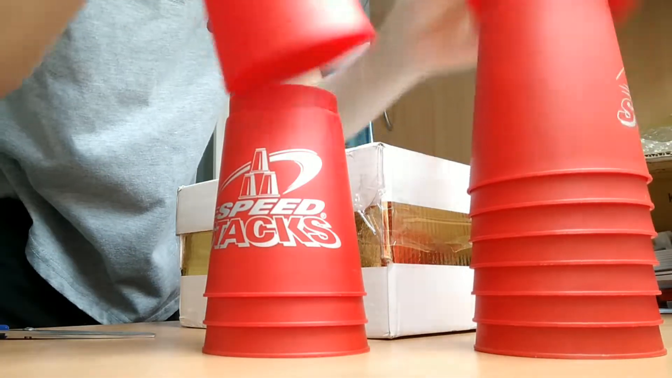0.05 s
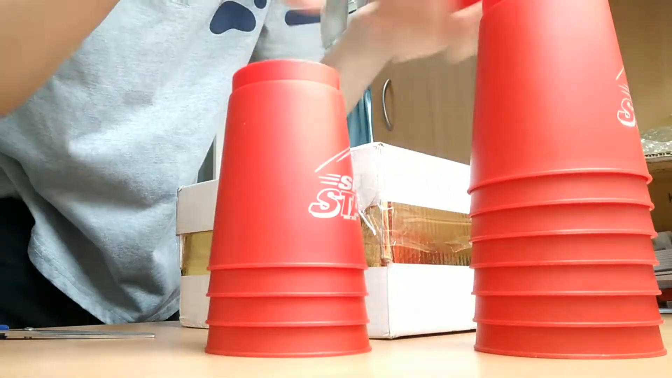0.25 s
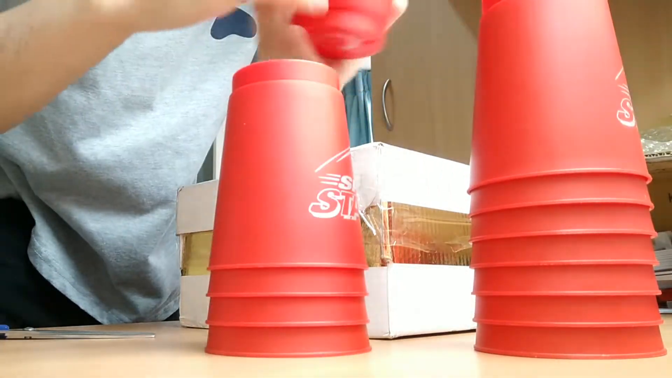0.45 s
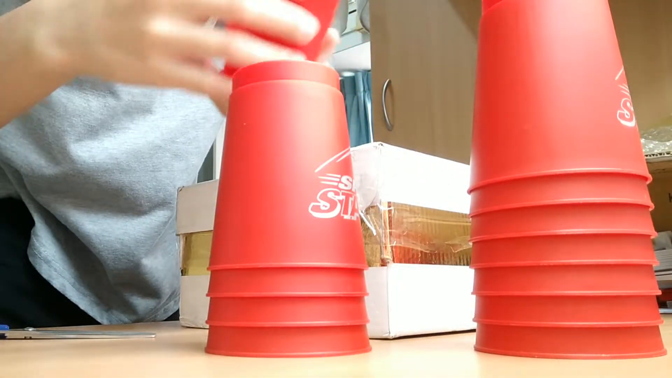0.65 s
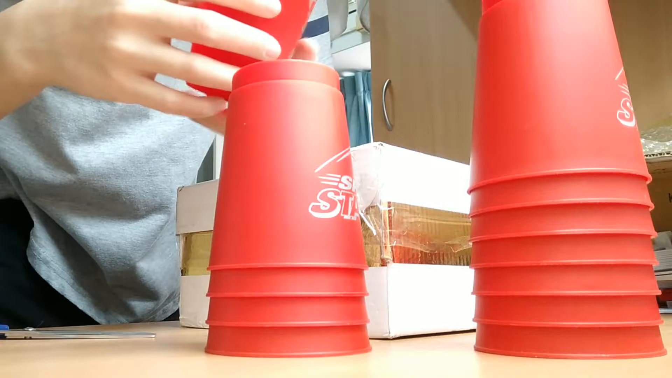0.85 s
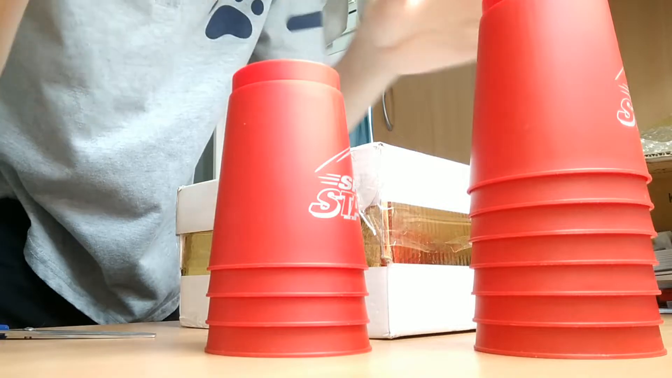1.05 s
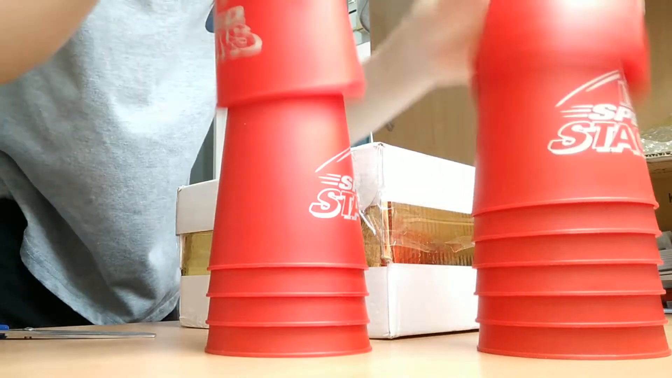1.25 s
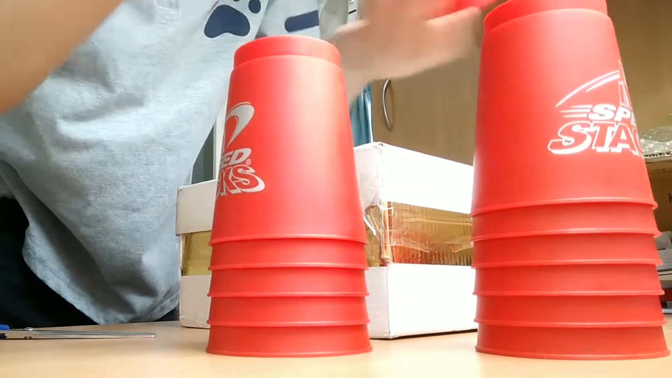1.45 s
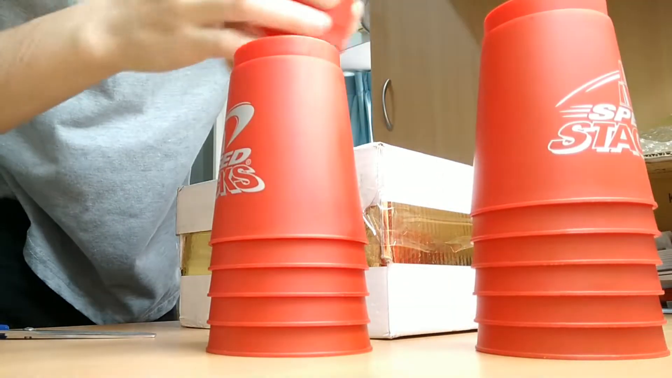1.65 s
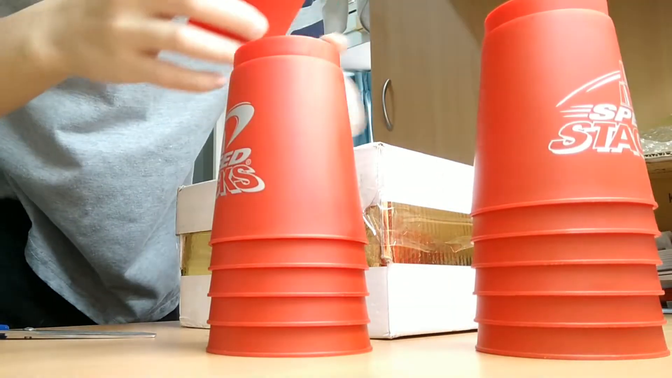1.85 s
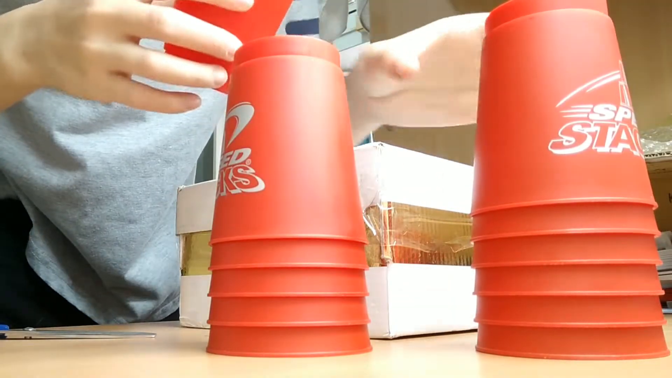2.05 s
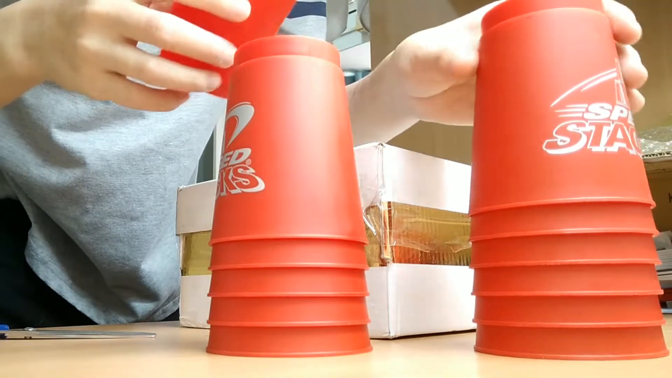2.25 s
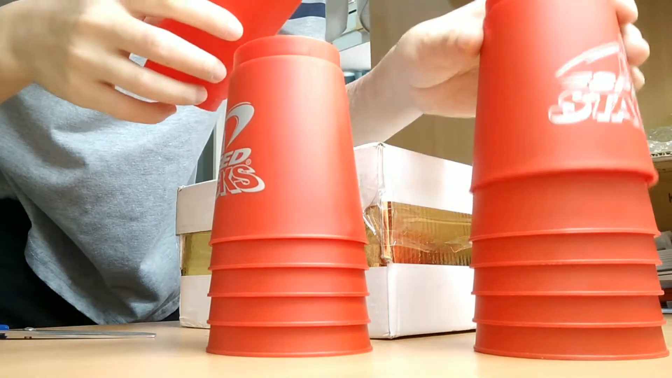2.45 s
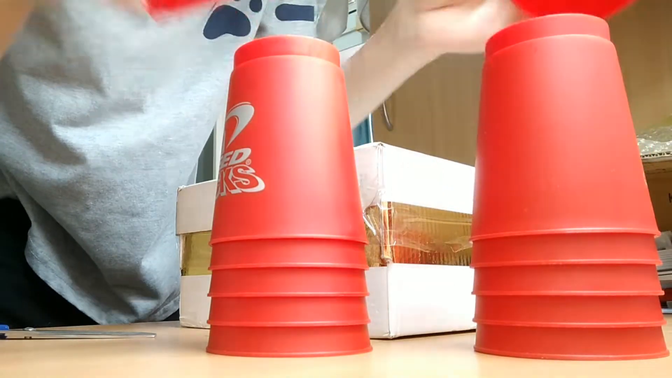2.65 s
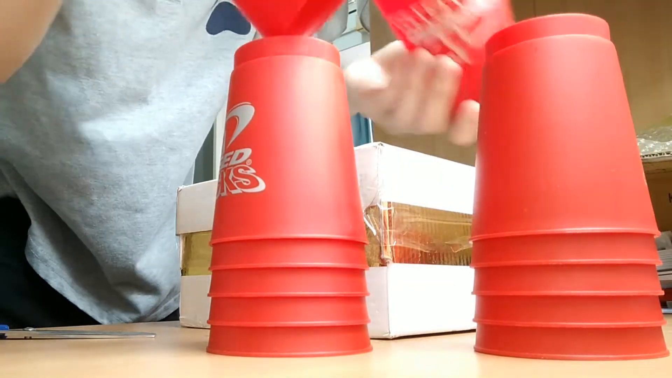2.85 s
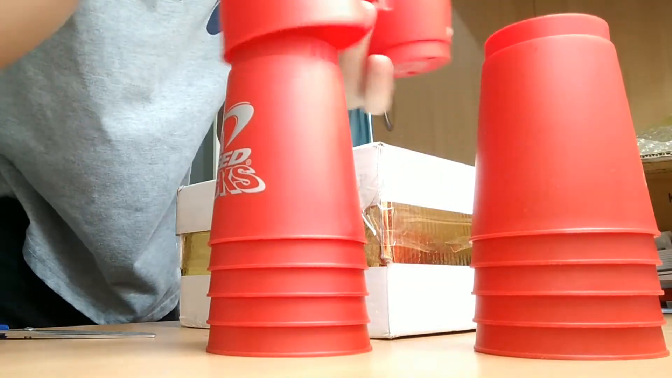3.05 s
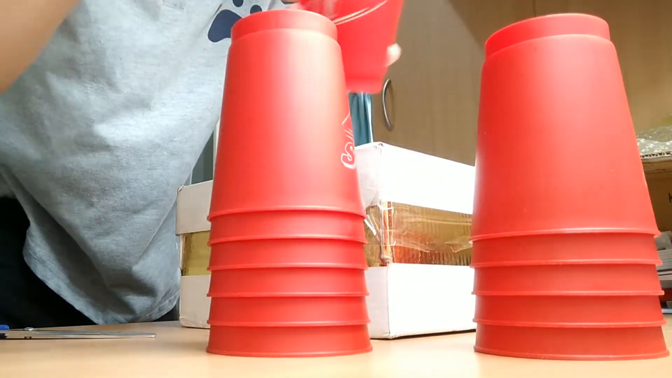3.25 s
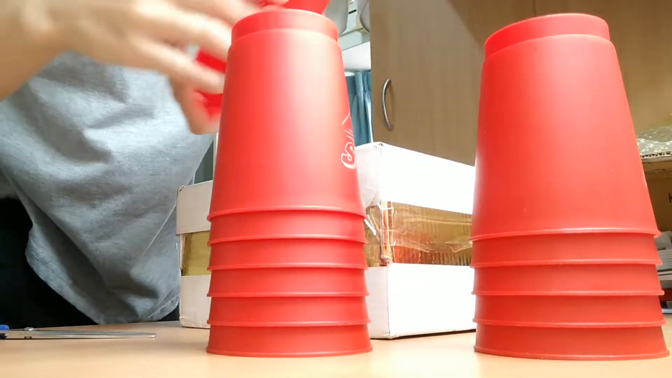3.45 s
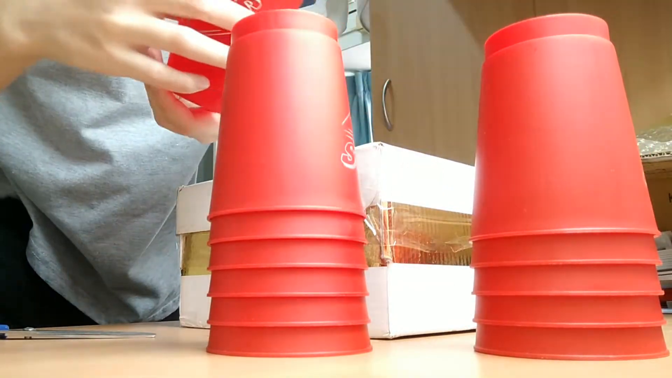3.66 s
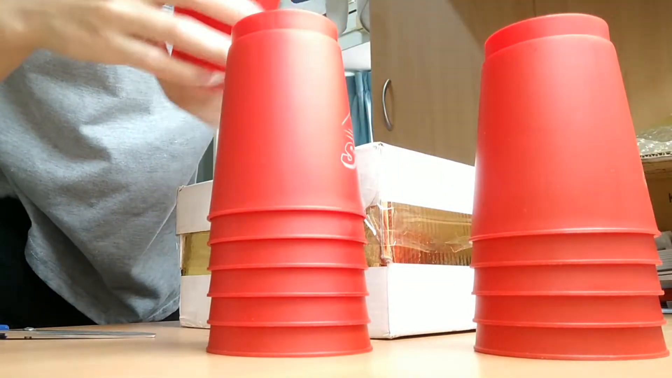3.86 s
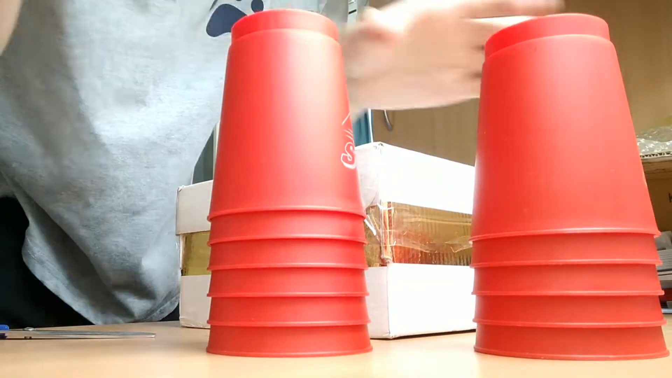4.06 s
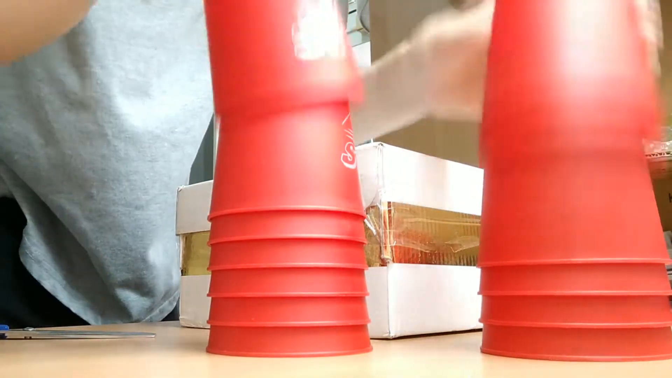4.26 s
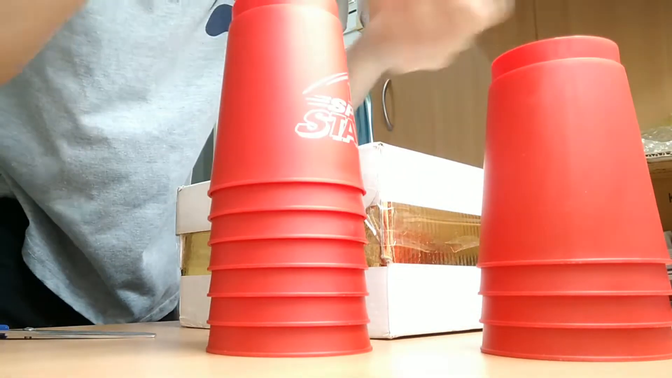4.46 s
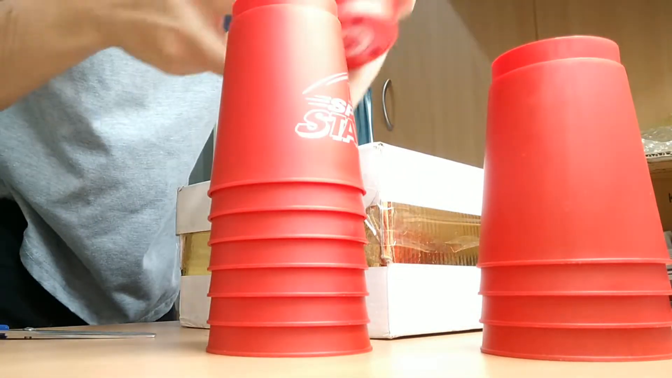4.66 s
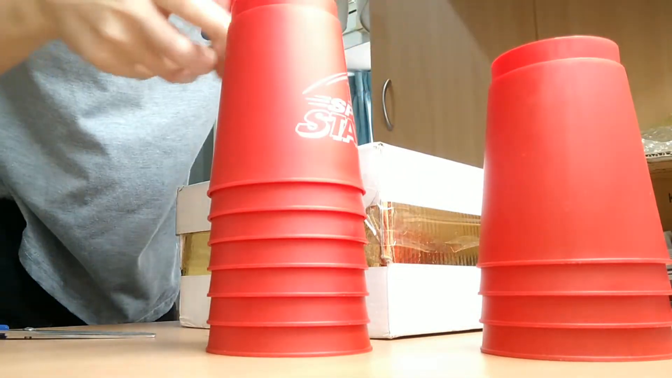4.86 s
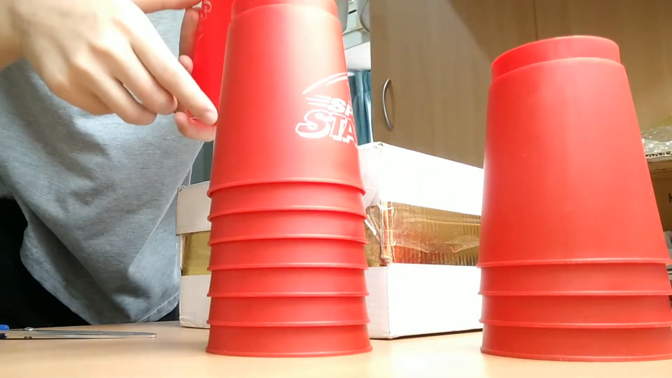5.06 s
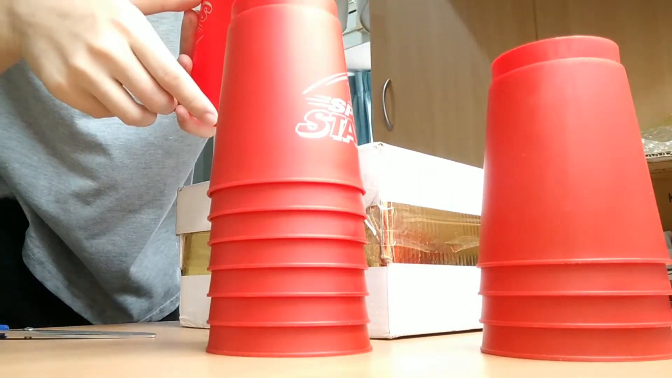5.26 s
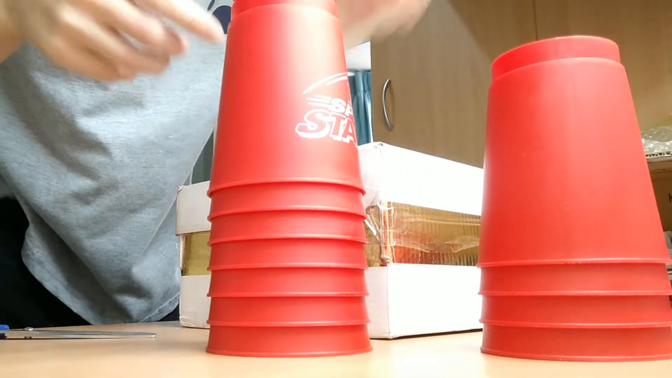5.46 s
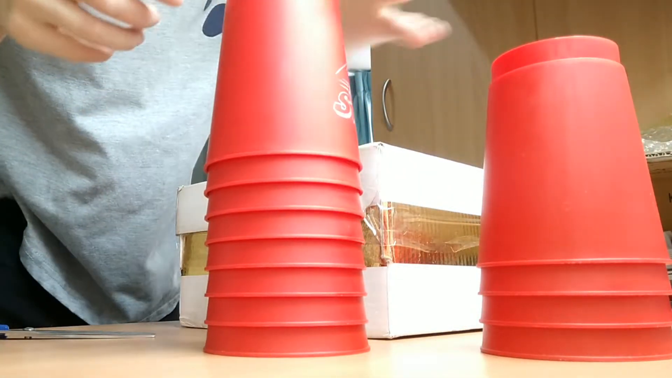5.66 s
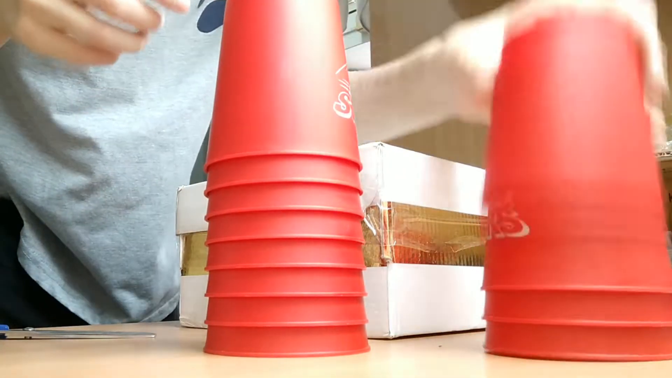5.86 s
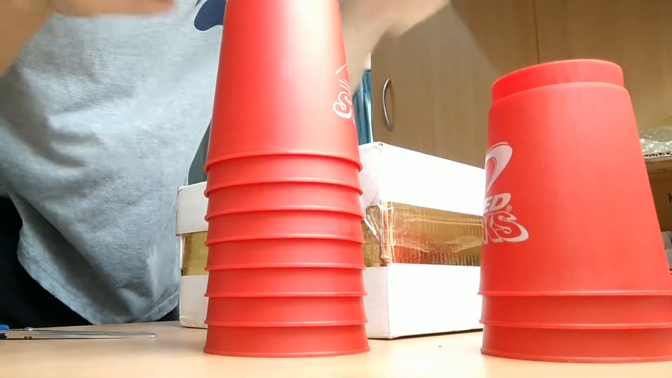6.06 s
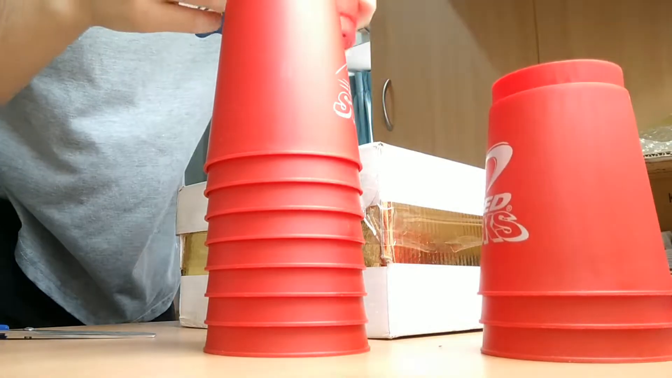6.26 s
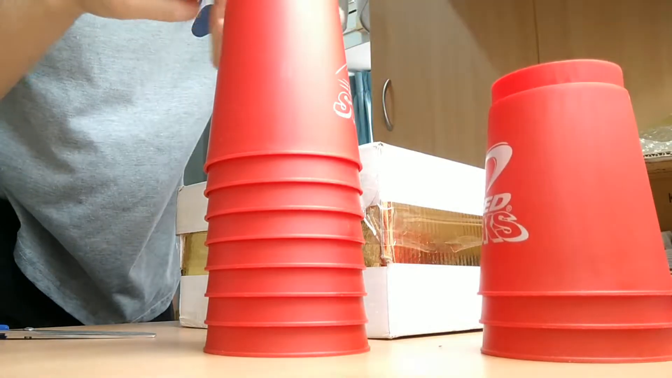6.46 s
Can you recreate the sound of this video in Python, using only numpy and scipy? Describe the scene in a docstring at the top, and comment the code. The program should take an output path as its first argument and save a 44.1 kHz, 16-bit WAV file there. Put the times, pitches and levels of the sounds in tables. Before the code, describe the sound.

Thin plastic cups clack and rattle in loud quick bursts as they are dropped onto nested stacks on a wooden table, with faint finger creaks between.

```python
"""A soft bump and a short hiss come first: a hand draws a thin plastic cup off its nested stack.
Then cups are lifted and dropped on stacks on a wooden table in a small quiet room. Rattling contacts ring
cup walls and rims, pushes boom in the table top, friction noise hisses in the gap between sliding walls,
and fingertip slips creak and rustle. Filtered noise and one sine make the low rumble and hum under all."""
import sys
import numpy as np
from scipy import signal
from scipy.fft import rfft, irfft, next_fast_len
from scipy.io import wavfile
from scipy.ndimage import uniform_filter1d

SR = 44100
rng = np.random.default_rng(int(sys.argv[2]) if len(sys.argv) > 2 else 0)


def waveform_to_disk(signal):
    """Save audio, clipped to [-1, 1], as 16-bit WAV at the path in sys.argv[1]."""
    frames = np.transpose(np.atleast_2d(signal))
    scaled = np.clip(frames, -1, 1) * 32767
    samples = np.round(scaled).astype(np.int16)
    wavfile.write(sys.argv[1], SR, samples)


def how_loud(loudness_db):
    """Turn decibels into a plain amplitude multiplier (0 dB gives 1, 20 dB gives 10)."""
    steps = np.asarray(loudness_db, float) / 20
    return 10 ** steps


N = 287091  # length in samples

# Rim meets rim or wood. Each row: start in seconds, cup level in dB, favoured wall pitch in Hz,
# table level in dB, crack level of the rim in dB. Fixed trims are added to the levels later.
KNOCKS = [(0.193, -9, 1432, -27.5, -19), (0.28, -21.5, 1084, -27.5, -25), (0.303, -9.5, 1530, -28, -24),
          (0.319, -6, 1454, -19, -22.5), (1.315, -32.5, 564, -39, -54), (1.36, -25.5, 589, -25, -30),
          (1.371, -16.5, 1144, -34, -24), (1.423, -24, 1030, -32.5, -27.5),
          (1.44, -4.5, 1190, -22.5, -12.5), (1.46, -6, 580, -15, -18.5), (2.383, -41.5, 530, -35, -62),
          (2.709, -36.5, 1190, -80.5, -37), (2.935, -10.5, 1100, -20, -27), (3.01, -39, 1600, -43.5, -32),
          (3.125, -15, 1520, -30.5, -31.5), (3.168, -23, 1497, -25.5, -40), (3.233, -32.5, 1770, -39, -42),
          (3.242, -27.5, 1100, -48.5, -36.5), (3.3, -13, 1100, -23, -21), (3.327, -3, 1072, -14.5, -18.5),
          (4.349, -18, 1173, -27, -26), (4.366, -17.5, 562, -23.5, -29), (4.38, -10.5, 1050, -24, -20.5),
          (4.388, -11, 1080, -25.5, -20), (4.42, -19, 1070, -22, -24.5), (4.436, -15.5, 568, -33.5, -26.5),
          (4.458, -11.5, 1000, -20, -29), (4.821, -40, 1093, -85.5, -70.5), (5.666, -6.5, 1082, -21.5, -18),
          (5.675, -9.5, 1100, -26, -16.5), (5.686, -8.5, 1090, -27, -14), (5.704, -20.5, 1100, -37.5, -41),
          (5.721, -28.5, 602, -24.5, -39.5), (5.734, -16, 543, -26, -24), (5.754, -11, 1000, -18.5, -21),
          (5.953, -34, 550, -34, -48.5), (5.973, -27, 567, -45, -33.5), (5.999, -14, 1120, -25.5, -32),
          (6.007, -7.5, 1190, -45, -27.5), (6.033, -24, 1465, -24, -30.5)]
# Ways the cup wall rings. Each row: pitch in Hz, relative level in dB, time to fall by 60 dB in seconds.
WALL_MODES = [(547, -2, 0.092), (638, 0.5, 0.037), (796, -2, 0.013), (1000, -6, 0.032), (1100, -2.5, 0.032),
              (1190, 2.5, 0.037), (1510, -2.5, 0.039), (1530, 0, 0.018), (1714, -8, 0.063),
              (2309.6, -4.5, 0.014), (2525, -6.5, 0.0086)]
# Ways the rim rings. Each row: pitch in Hz, relative level in dB, time to fall by 60 dB in seconds.
RIM_MODES = [(2650, -3, 0.034), (2920, 2.5, 0.011), (3260, 4.5, 0.012), (3900, -5, 0.0093), (4375, 0, 0.01),
             (5020, -2.5, 0.011), (6115, -6.5, 0.01), (6800, -8, 0.0072), (7540, -8.5, 0.0051),
             (9950, -12.5, 0.0058)]


def knocks():
    """Each contact is a short rattle that rings the cup wall and rim."""
    rattle_t60, place_s = 0.025, 0.00005  # seconds; place_s: spread of the arrival gap between the ports
    # the more a knock cracks against its ring, the higher the rim modes it favours
    crack_hz, octaves_per_db, sharpest_db = 4600, 0.36, -8
    cups = np.zeros((3, N))  # left, right, and the plainer clack that leaves for the room walls
    chance = rng.standard_normal((len(KNOCKS), 3, 12))
    rattle = rng.standard_normal((len(KNOCKS), 2000))
    wall_hz = np.transpose(WALL_MODES)[0]
    t = np.arange(rattle.shape[1]) / SR
    impulse = signal.unit_impulse(300)
    walls, rims = len(WALL_MODES), len(RIM_MODES)
    for (s, cup_db, ring_hz, _, crack_db), (luck, *ears), noise in zip(KNOCKS, chance, rattle):
        force = noise * (1 - np.exp(-t / 0.001)) * how_loud(-60 * t / rattle_t60)

        # the nearest wall mode takes the favoured pitch, the others are slightly off
        off = abs(wall_hz - ring_hz)
        pull = np.where(off == off.min(), ring_hz / wall_hz, 1 + 0.02 * luck[:walls])
        wall_db = favour(WALL_MODES, ring_hz, depth_db=11, octaves=0.19)
        wall = np.array([ring(WALL_MODES, wall_db + 2.2 * e[1:walls + 1], pull, 0.088) for e in ears])
        wall = struck(band(force, 450, 2400), wall, cup_db + 1.5)

        # the rim beams each mode its own way, so the ports hear different mixtures
        dullness_db = min(crack_db - cup_db - sharpest_db, 0)
        rim_hz = crack_hz * 2 ** (octaves_per_db * dullness_db)
        rim_db = favour(RIM_MODES, rim_hz, depth_db=12.5, octaves=4.1)
        rim = np.array([ring(RIM_MODES, rim_db + 3.8 * e[:rims], 1 + 0.043 * e[-rims:], 0.018) for e in ears])
        rim = struck(band(force, 1800, 9400), rim, crack_db + 6.5)

        add(cups[2], s, struck(force, band(impulse, 450, 1600), cup_db - 1.5))
        add(cups[2], s, struck(force, band(impulse, 1500, 6100), crack_db + 2))
        # each knock comes from its own spot
        for port, gap_s in enumerate((0, place_s * luck[-1])):
            add(cups[port], s + gap_s, wall[port])
            add(cups[port], s + gap_s, rim[port])
    return cups


# A wrist or arm bumps the table. Each row: start in seconds, table level in dB before a fixed trim.
BUMPS = [(0.021, -38), (1.188, -47), (3.509, -39.5), (5.01, -50), (6.428, -47)]
# Ways the table top rings. Each row: pitch in Hz, relative level in dB, time to fall by 60 dB in seconds.
TABLE_MODES = [(87.5, -12, 0.69), (125.4, -6.5, 0.34), (170, -4.5, 0.095), (203.24, 6, 0.18),
               (211, 4.5, 0.12), (260, -7, 0.079), (330.5, -13, 0.12)]


def thuds():
    """Every knock and bump is a soft push that rings the table top."""
    spot_db = 3.5  # how much the modes change with the spot that is pushed
    table = np.zeros(N)
    pushes = [(row[0], row[3]) for row in KNOCKS] + BUMPS
    modes = len(TABLE_MODES)
    for (s, table_db), luck in zip(pushes, rng.standard_normal((len(pushes), 12))):
        body = ring(TABLE_MODES, spot_db * luck[:modes], 1 + 0.015 * luck[-modes:], 0.3)
        add(table, s, struck(signal.windows.hann(130), body, table_db + 4))
    return table


# Wall slides on wall: a cup is drawn off its stack, sinks over a stack, shuffles to rest after a blow,
# or brushes another in the hand. Each row: start in seconds, length in seconds, then the levels of hiss,
# wall and table in dB at full speed (the wall gets a fixed trim).
LIFTS = [(0.035, 0.14, -41.5, -59, -61.5), (2.505, .215, -41.5, -52, -74)]
DROPS = [(1.29, .145, -37, -36, -30.5), (4.31, 0.13, -37, -32.5, -34), (5.712, .04, -40.5, -26.5, -27),
         (5.935, .112, -37.5, -35.5, -34.5)]
SETTLES = [(0.21, 0.12, -48.5, -42, -40), (2.39, 0.041, -68, -44.5, -45), (4.875, 0.059, -64.5, -54, -84),
           (5.695, .02, -32.5, -24, -28.5)]
SCUFFS = [(2.94, 0.03, -41.5, -30, -35.5), (3.0, 0.036, -50, -41.5, -52), (4.822, 0.054, -55, -38, -84)]
# How each kind moves. One row each: speed at the start in dB, rise and fall as shares of the length,
# speed the fall heads for in dB, gap resonance in Hz at the start and at the end.
LIFT_MOTION = (-31, 0.76, 0.15, -12, 3649, 4950)
DROP_MOTION = (-39, 0.68, 0.33, -5.5, 3699.5, 3998.5)
SETTLE_MOTION = (-1.5, 0.4, 1.33, -11.5, 3252, 4001)
SCUFF_MOTION = (-7.5, 0.43, 0.56, -9.5, 2902, 3202.5)
# Resonances of the air gap. Each row: multiple of the main gap pitch, core filter width in Hz,
# relative level in dB.
GAP_MODES = [(1, 420, 1), (1.6, 1100, 0), (2.4, 3500, -2), (.74, 600, -4), (1.3, 1500, -5)]


def slides():
    """Friction grains sing in the air gap between two walls, rising as it opens, and shake wall and table."""
    grit_db = 3.2  # unevenness of the friction
    skirt = 4  # skirt width over core width of a gap resonance
    wall_follows = 0.8  # wall dB per dB of speed
    wobble = 0.035  # the cup rocks, so the gap resonance wanders by this share
    rub_widens = 3.4  # width in Hz times ring time in seconds of a wall mode under rubbing
    hiss, table = np.zeros(N), np.zeros(N)
    wall_modes = [(hz, rub_widens / t60, db) for hz, db, t60 in WALL_MODES]
    kinds = ((LIFTS, LIFT_MOTION), (DROPS, DROP_MOTION), (SETTLES, SETTLE_MOTION), (SCUFFS, SCUFF_MOTION))
    for rows, (*motion, first_hz, last_hz) in kinds:
        for s, length, hiss_db, wall_db, table_db in rows:
            progress, speed_db = swell(length, *motion)
            count = len(progress)
            rocking = uniform_filter1d(uniform_filter1d(rng.standard_normal(count), 500), 500)
            gap_hz = first_hz + (last_hz - first_hz) * progress
            gap_hz = gap_hz * (1 + wobble * evened(rocking))
            grit = evened(uniform_filter1d(rng.standard_normal(count), 70))
            grains = rng.standard_normal(count) * how_loud(grit_db * grit)

            # faster sliding is brighter: extra dB per octave above the main gap pitch
            bright_db = 0.82 * (np.clip(hiss_db + speed_db, -80, -40) + 43)
            gap = np.zeros(count)
            for multiple, width, db in GAP_MODES:
                core = resonate(grains, multiple * gap_hz, width)
                tone = resonate(core, multiple * gap_hz, width * skirt) / np.sqrt(width)
                gap += how_loud(db + bright_db * max(np.log2(multiple), 0)) * tone
            # the gap is too narrow to pass low tones
            gap = band(band(gap, 2600, 11000), 2600, 14000)
            wall = band(band(modes_on(grains, wall_modes), 900, 3500), 800, 4000)
            shake = evened(resonate(resonate(grains, 205, 38), 205, 81))

            edge = signal.windows.tukey(count, 0.12)
            gap = how_loud(hiss_db + speed_db) * evened(gap)
            wall = how_loud(wall_db - 7 + wall_follows * speed_db) * wall
            add(hiss, s, (gap + wall) * edge)
            add(table, s, how_loud(table_db + 0.4 * speed_db) * shake * edge)
    return hiss, table


# Fingers turn a cup. Each row: start in seconds, length in seconds, creak and rustle in dB at full grip.
CREAKS = [(0.573, .05, -92, -83.5), (1.15, .14, -81, -86), (1.601, 0.093, -76.5, -85.5),
          (1.689, 0.062, -87.5, -69.5), (2.86, 0.077, -74, -79), (3.039, 0.053, -57.5, -67),
          (3.447, 0.15, -74, -83.5), (4.08, 0.15, -74, -77), (4.544, 0.0886, -78, -80),
          (4.301, 0.066, -78, -75.5), (4.647, .09, -82, -69), (5.645, 0.015, -61.5, -89.5)]
# Single slips of a fingertip. Each row: start in seconds, creak and rustle in dB at the start.
TICKS = [(0.8596, -72.5, -66), (3.9244, -71.5, -82), (4.704, -70.5, -79), (4.7242, -71, -85),
         (4.7523, -63.5, -81), (4.7872, -85, -78), (5.0403, -72, -78), (5.1108, -68, -79),
         (5.1577, -70.5, -78.5), (5.232, -60, -75.5), (5.3282, -76, -85), (5.4575, -64, -78),
         (6.337, -58.5, -61.5), (6.4741, -63, -81.5)]
# Creaking tones. Each row: pitch in Hz, filter width in Hz, relative level in dB.
CREAK_MODES = [(1530, 160, -2.5), (1580, 90, -6)]
# Rustling bands. Each row: pitch in Hz, filter width in Hz, relative level in dB.
RUSTLE_MODES = [(3353, 550, -0.5), (5200, 820, -5.5), (6340, 890, 2), (8150, 3000, 0)]


def creaks():
    """Skin sticks and slips on the wall in small irregular clicks, and rustles over it."""
    grip_share, release_share, faint_db = 0.25, 0.12, -13.5  # a spell swells from faint, holds, and fades
    slip_s, creak_fall_db, rustle_fall_db = 0.06, -18, -32  # a single slip fades by this much
    creak, rustle = np.zeros(N), np.zeros(N)
    touches = []
    for s, length, creak_db, rustle_db in CREAKS:
        grip_db = swell(length, faint_db, grip_share, release_share, faint_db)[1]
        touches.append((s, creak_db + grip_db, rustle_db + grip_db))
    fade = swell(slip_s, 0, 1, 1, 0)[0]
    for s, creak_db, rustle_db in TICKS:
        touches.append((s, creak_db + creak_fall_db * fade, rustle_db + rustle_fall_db * fade))
    for s, creak_db, rustle_db in touches:
        count = len(creak_db)
        clicks = rng.random(count) < 900 / SR  # about 900 a second
        slips = rng.standard_normal(count) * (0.32 + 2.8 * clicks)
        edge = signal.windows.tukey(count, 0.1)
        add(creak, s, how_loud(creak_db) * modes_on(slips, CREAK_MODES) * edge)
        add(rustle, s, how_loud(rustle_db) * modes_on(slips, RUSTLE_MODES) * edge)
    return creak, rustle


# Colour of the two ports. Each row: pitch in Hz, left minus right in dB before each source's own shift.
PORT_COLOUR = [(60, -1.5), (180, 2), (550, -2), (1650, -5), (4970, 7.5), (15000, -14)]


def ports(x, lead_ms, shift_db):
    """Two microphone ports: the left hears earlier (later if lead_ms is negative), with its own colour."""
    size = next_fast_len(N + 512)
    hz = np.fft.rfftfreq(size, 1 / SR)
    side = np.array([[0.5], [-0.5]])
    # the housing stops the lead from growing in the treble
    turns = lead_ms / 1e3 * hz / (1 + (hz / 4200) ** 2)
    level = how_loud(side * (read(PORT_COLOUR, hz) + shift_db))
    return irfft(rfft(x, size) * level * np.exp(2j * np.pi * turns * side), size)[:, :N]


# How the room dies away. Each row: pitch in Hz, time to fall by 60 dB in seconds.
ROOM_T60 = [(100, 0.36), (300, .3), (1000, 0.14), (3000, 0.22), (6500, 0.17), (9000, 0.18)]


def room(x):
    """Sparse echoes of random sign, each band dying at its own speed."""
    taps = np.zeros((2, SR // 2))
    at = np.arange(150, SR // 2 - 20, 20) + rng.integers(0, 20, (2, (SR // 2 - 151) // 20))
    np.put_along_axis(taps, at, rng.choice([-1., 1.], at.shape), 1)
    taps[1] = 2.4 * taps[0] + 1.1 * taps[1]  # the right shares the left's echoes and is louder
    hz, t, z = signal.stft(taps, SR, nperseg=256)
    t60 = np.maximum(read(ROOM_T60, hz), 0.02)[:, None]
    tail = signal.istft(z * how_loud(-60 * t / t60), SR, nperseg=256)[1]
    return signal.fftconvolve(x[None], tail / np.linalg.norm(tail[0]), axes=1)[:, :N]


# Spectrum of the rumble. Each row: pitch in Hz, relative level in dB.
AIR = [(15, -52.5), (25, -26.5), (48, -19), (72, -1), (149, -17), (185, -8), (309, -26), (363, -38),
       (489, -27.5), (1070, -37.5), (1560, -50), (2050, -43), (6740, -53.5), (13600, -54), (16000, -65.5)]
# How alike left and right are. Each row: pitch in Hz, likeness from -1 to 1.
AIR_SAME = [(60, 0.94), (180, 1), (550, 0.11), (1650, 0.12), (4970, -0.036), (15000, -0.52)]


def air():
    """Low rumble of the building, noise with patchy levels in time and pitch, and one steady sine hum."""
    rumble_db, hum_db, hum_hz = -62.5, -70, 179.5  # levels are rms
    frames, hz = N // 512 + 5, np.fft.rfftfreq(2048, 1 / SR)
    a, b, c, d, patches = rng.standard_normal((frames, 1025, 5)).T
    patches = evened(uniform_filter1d(uniform_filter1d(patches, 5, 0), 6, 1))
    same = np.clip(read(AIR_SAME, hz), -1, 1)[:, None]
    left = a + 1j * b
    right = same * left + np.sqrt(1 - same ** 2) * (c + 1j * d)
    z = np.array([left, right]) * how_loud(read(AIR, hz)[:, None] + 2.2 * patches)
    rumble = how_loud(rumble_db) * evened(signal.istft(z, nperseg=2048, noverlap=1536)[1][:, :N])
    hum = np.sqrt(2) * np.sin(2 * np.pi * hum_hz * np.arange(N) / SR)
    return rumble + how_loud(hum_db) * hum


def evened(x):
    """Scales to rms 1."""
    return x / np.sqrt(np.mean(x ** 2) + 1e-20)


def read(points, hz):
    """Reads a table on a log-frequency axis."""
    f, value = np.transpose(points)
    return np.interp(np.log(hz + 1), np.log(f + 1), value)


def add(mix, s, sound):
    """Mixes a sound in at time s, in seconds."""
    part = mix[round(s * SR):][:len(sound)]
    part += sound[:len(part)]


def resonate(x, hz, width):
    """Shifts the pitch hz (fixed or a curve) down to zero, smooths, and shifts back: a resonance."""
    turn = np.exp(2j * np.pi * np.cumsum(hz * np.ones(len(x))) / SR)
    r = np.exp(-np.pi * width / SR)
    return 2 * (turn * signal.lfilter([1 - r], [1, -r], x / turn + 1e-18)).real


def ring(modes, favour_db, detune, seconds):
    """A struck body rings as a sum of dying sines."""
    hz, db, t60 = np.transpose(modes)[:, :, None]
    t = np.arange(round(seconds * SR)) / SR
    level = how_loud(db + favour_db[:, None] - 60 * t / t60)
    return (level * np.sin(2 * np.pi * hz * detune[:, None] * t)).sum(0)


def struck(force, body, peak_db):
    """A force passes through a body; scaled to its peak."""
    sound = signal.fftconvolve(force * np.ones_like(body[..., :1]), body, axes=-1)
    return how_loud(peak_db) * sound / abs(sound).max()


def band(x, low_hz, high_hz):
    """Steep band-pass."""
    return signal.sosfilt(signal.butter(2, [low_hz, high_hz], "band", fs=SR, output="sos"), x)


def modes_on(noise, modes):
    """Noise through steep fixed resonances, rms 1."""
    tones = [how_loud(db) * evened(resonate(resonate(noise, hz, w), hz, 2 * w)) for hz, w, db in modes]
    return evened(sum(tones))


def favour(modes, hz, depth_db, octaves):
    """Grip and nesting favour the modes near one pitch."""
    return -depth_db * np.minimum(abs(np.log2(np.transpose(modes)[0] / hz)) / octaves, 1)


def swell(length, start_db, rise, fall, end_db):
    """Progress 0-1 through a gesture, and its effort in dB; rise and fall are shares of the length."""
    u = np.arange(round(length * SR)) / (length * SR)
    return u, start_db * np.clip(1 - u / rise, 0, 1) + end_db * np.clip(1 - (1 - u) / fall, 0, 1)


def scene():
    """Cups near the left port, creaks to the right, the table straight through the housing."""
    cups = knocks()
    hiss, shake = slides()
    creak, rustle = creaks()
    wood = thuds() + shake
    direct = ports(cups[:2], lead_ms=0.13, shift_db=4.5)
    direct += ports(hiss + rustle, lead_ms=0.15, shift_db=10)
    direct += ports(creak, lead_ms=-0.088, shift_db=-7.5)
    direct += wood * how_loud([[0.6], [-0.6]])
    # cloth and card soak up the treble of what the room sends back
    sent = band(band(cups[2] + hiss + creak + rustle + 0.81 * wood, 170, 7100), 53, 7500)
    return band(direct + how_loud(-15) * room(sent), 99, 21000) + air()


def roll_off(x):
    """The treble ends steeply here."""
    return signal.sosfilt(signal.butter(12, 16430, fs=SR, output="sos"), x)


def record(dry):
    """A soft overload rounds off the loudest peaks near full scale."""
    headroom = 1.15
    mix = headroom * np.tanh(dry / headroom)
    return roll_off(mix)


dry = scene()
out = record(dry)
waveform_to_disk(out)
```